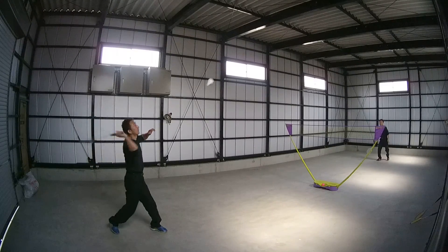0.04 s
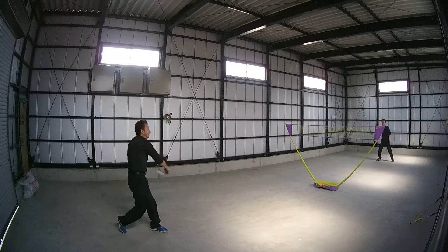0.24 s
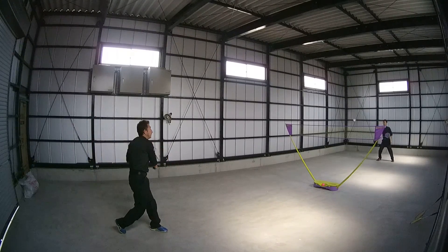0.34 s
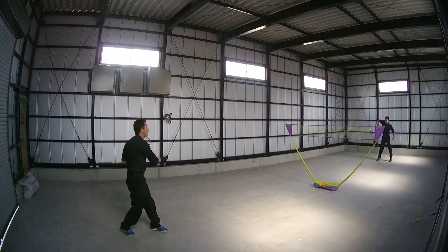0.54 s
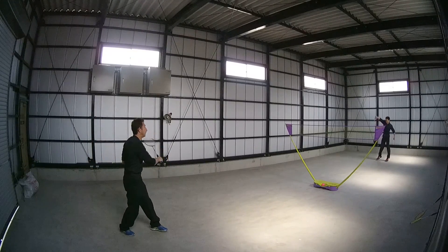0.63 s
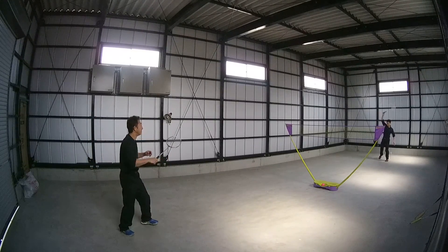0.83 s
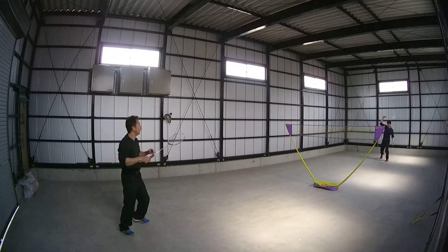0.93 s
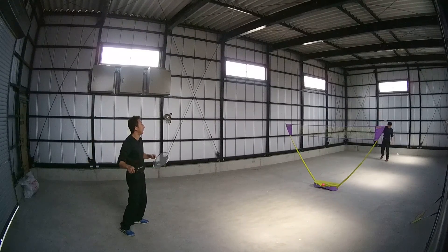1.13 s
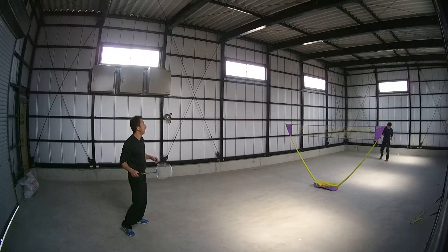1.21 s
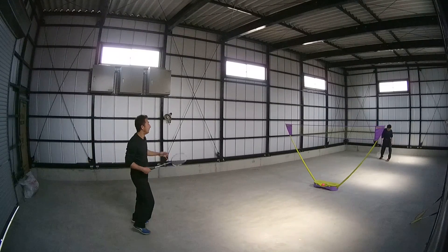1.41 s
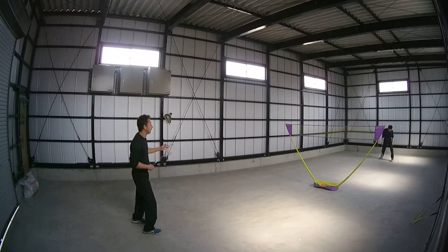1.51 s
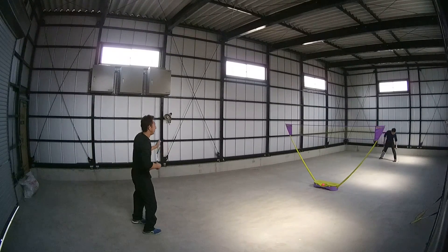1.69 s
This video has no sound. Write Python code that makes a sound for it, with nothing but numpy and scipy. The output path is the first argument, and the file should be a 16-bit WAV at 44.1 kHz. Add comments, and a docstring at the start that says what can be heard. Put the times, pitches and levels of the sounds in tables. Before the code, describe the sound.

Badminton rackets hit a shuttlecock close by, then farther off, in an echoing hall.

```python
"""Badminton rackets smack a shuttlecock in a large, empty, metal-walled warehouse: near, then far.
Each impact of the cork is a brief crack that excites the damped modes of strings and frame.
The swings whistle as air flows past the racket; shoes scuff and tap on the concrete.
Floor, walls and roof return discrete echoes, then diffuse reverberation, over a low background rush."""
import sys
import numpy as np
from scipy import signal
from scipy.fft import rfft, irfft
from scipy.io import wavfile
from scipy.ndimage import uniform_filter1d

SR = 44100
rng = np.random.default_rng(int(sys.argv[2]) if len(sys.argv) > 2 else 0)


def generate_wav(sig):
    """Save sig (samples, or channels by samples) to the path in sys.argv[1] as 16-bit PCM at SR."""
    pcm = np.round(np.clip(np.atleast_2d(sig).T, -1, 1) * 32767).astype(np.int16)
    wavfile.write(sys.argv[1], SR, pcm)


N = 77175
NEAR_S, FAR_S = 0.2217, 0.7325  # moments of contact
IMPACT_RISE_S = 0.00069

# Spectral envelopes of the two impacts: frequency_hz, relative_db
NEAR_SPECTRUM = [(40, -44), (130, -24.5), (350, -3), (600, 3.5), (850, 7), (1080, 6.5), (1250, -5),
                 (2200, -1), (4000, -8), (6000, -2), (7300, -9), (9200, -2.5), (11500, -8), (15000, -19)]
FAR_SPECTRUM = [(50, -33), (150, -12), (500, -2.5), (900, -3.5), (1250, -0.5), (1800, 4.5), (2300, 1.5),
                (2900, 4), (3400, 0.5), (3900, -3.5), (5300, -0.5), (7200, -6.5), (9200, 2), (11500, -8.5),
                (15000, -15.5)]
# Normal modes of strings and frame: pitch_hz, relative_db, t60_s
NEAR_MODES = [(847, -20.5, 0.46), (1056, -30, 0.6), (2058, -42, 0.6), (2295, -21.5, 0.39), (3152, -27, 0.3),
              (4040, -23, 0.16), (6760, -30, 0.043), (8680, -17, 0.045), (9250, -17.5, .1)]
FAR_MODES = [(1863, -15.5, 0.096), (2890, -22, 0.022), (2950, -13, 0.078), (3350, -13.5, 0.01),
             (5370, -19, 0.016)]
# Response of the direct path, weaker in the midrange than the hall: frequency_hz, relative_db
DIRECT_SPECTRUM = [(50, -2.5), (280, 7), (900, -8.5), (2000, -5.5), (3400, 0.5), (5500, 1.5), (12000, 5)]
# Reflections from the floor and nearest walls: delay_s, relative_db, smear_s
EARLY_REFLECTIONS = [(.0082, 0, .002), (.0112, -0.5, .003), (.0145, -4, 0.0076), (.0272, -5, 0.0026)]
# Later, duller echoes from the sheet-metal walls and roof: delay_s, relative_db
WALL_ECHOES = [(.068, -13.5), (.094, -9), (.166, -14)]
# Airflow past shaft and strings: peak_s, level_db, centre_hz
SWINGS = [(0.216, -26, 864), (0.72, -35.5, 754)]
# Soles sliding on concrete: start_s, length_s, level_db
SLIDES = [(-.03, 0.13, -41.5), (0.124, 0.057, -45.5), (0.196, 0.045, -38.5), (.572, 0.07, -50),
          (.89, 0.047, -47), (1.011, 0.094, -56), (1.092, 0.06, -60), (1.236, 0.049, -65),
          (1.335, 0.1, -65.5), (1.486, 0.11, -57.5), (1.566, 0.076, -45.5)]
# Spectrum of sliding friction: frequency_hz, relative_db
FRICTION_SPECTRUM = [(300, -15), (1300, -10), (2100, -3), (3600, -2), (4700, -5.5), (6200, -0.5),
                     (7300, -10.5), (9300, 2), (12000, -9), (15000, -21.5)]
# Footfalls and creaks of soles: start_s, level_db, centre_hz, width_hz, decay_s
FOOTFALLS = [(0, -53, 612, 556, 0.051), (.005, -51, 1830, 600, .03), (1.047, -41, 690, 500, 0.029),
             (1.068, -45, 1900, 700, 0.022), (1.441, -47.5, 545, 490, 0.012),
             (1.54, -54.5, 1910, 796, 0.014), (1.552, -41, 1900, 1030, 0.0017),
             (1.564, -52, 2310, 1013, 0.054), (1.715, -40.5, 1760, 680, 0.0022)]
# Reverberation time of the hall: frequency_hz, t60_s
HALL_T60 = [(100, 1.6), (350, 1.75), (800, 2.055), (1500, 1.72), (2700, 1.22), (4200, 0.63), (6300, 0.68),
            (9500, .5), (15000, 0.26)]
# Spectrum of the background rush: frequency_hz, relative_db
RUSH_SPECTRUM = [(25, -63), (60, -28.5), (100, -20.5), (200, -4.5), (320, -5.5), (600, -1.5), (850, -5),
                 (1250, -17.5), (2000, -21.5), (4000, -32.5), (9000, -33.5), (15000, -39.5)]


def smack(start_s, spectrum, modes, level_db, direct_db, early_db):
    """Impact excitation: cork strikes the string bed, and each normal mode decays exponentially."""
    t, out = np.arange(N) / SR, np.zeros(N)
    racket = np.zeros(N)
    for hz, mode_db, t60_s in modes:
        ring = np.sin(2 * np.pi * hz * t) * amp(-60 * t / t60_s)
        racket += amp(mode_db) * unit_energy(ring)
    add(racket, 0, click(spectrum))
    add(out, start_s, convolve(racket, impact_paths(direct_db, early_db)))
    return amp(level_db) * out


def impact_paths(direct_db, early_db):
    """Multipath propagation: the direct crack, delayed reflections and the diffuse tail add."""
    crack = burst(rng.choice([-1., 1.], N), IMPACT_RISE_S, decay_s=0.0016)
    paths = amp(direct_db) * convolve(crack, click(DIRECT_SPECTRUM)) + hall()
    for delay_s, db, smear_s in EARLY_REFLECTIONS:
        reflection = burst(rng.standard_normal(N), IMPACT_RISE_S, smear_s)
        add(paths, delay_s, amp(db + early_db) * reflection)
    for delay_s, db in WALL_ECHOES:
        echo = burst(noise_band(centre_hz=670, width_hz=750), rise_s=0.0054, decay_s=0.0054)
        add(paths, delay_s, amp(db + early_db) * echo)
    return paths


def air_push(start_s, gain_db=-23.5, time_constant_s=0.0005):
    """Air displacement: the racket radiates one soft low pulse, compression then rarefaction."""
    u, out = np.arange(N) / SR / time_constant_s, np.zeros(N)
    add(out, start_s, amp(gain_db) * u * (2 - u) * np.exp(-u))
    return out


def swish(peak_s, level_db, centre_hz, rise_s=0.0097, fall_s=0.023):
    """Aerodynamic noise: it swells as the racket speeds up and fades in the follow-through."""
    t = np.arange(N) / SR - peak_s
    speed = np.exp(-(t / np.where(t < 0, rise_s, fall_s)) ** 2)
    flow = unit_energy(speed * noise_band(centre_hz, width_hz=620))
    air = amp(level_db) * np.linalg.norm(speed) * flow
    return reverberate(air, wet_db=-7.5)


def scuffs(rise_s=0.0067, fall_s=0.044, grain_db=1):
    """Sliding friction: soles on concrete make a hiss whose level flickers with the grit."""
    t, pressure = np.arange(N) / SR, np.zeros(N)
    for start_s, length_s, db in SLIDES:
        ramps = np.minimum((t - start_s) / rise_s, (start_s + length_s - t) / fall_s)
        pressure += amp(db) * np.clip(ramps, 0, 1)
    roughness = unit_rms(uniform_filter1d(rng.standard_normal(N), size=40))
    grit = unit_rms(amp(grain_db * roughness))
    return reverberate(pressure * grit * shaped_noise(FRICTION_SPECTRUM), wet_db=-4.5)


def steps():
    """Damped resonance: each knock or creak of a shoe is a band of noise that dies quickly."""
    out = np.zeros(N)
    for start_s, db, centre_hz, width_hz, decay_s in FOOTFALLS:
        knock = burst(noise_band(centre_hz, width_hz), IMPACT_RISE_S, decay_s)
        add(out, start_s, amp(db) * np.sqrt(decay_s * SR) * knock)
    return reverberate(out, wet_db=-6.5)


def reverberate(sound, wet_db):
    """Linear room response: a sound is heard together with its convolution with the hall."""
    return sound + amp(wet_db) * convolve(sound, hall())


def hall(gain_db=-26, treble_build_s=0.0055, bass_lag_s=0.023):
    """Diffuse field: the treble builds and dies first; lower frequencies build slowly and linger."""
    hz, t, field = signal.stft(rng.standard_normal(N), SR, nperseg=256)
    build_s = treble_build_s + bass_lag_s / (1 + (hz[:, None] / 1200) ** 2)
    growth = 1 - np.exp(-t / build_s)
    decay = amp(-60 * t / curve_at(HALL_T60, hz)[:, None])
    return amp(gain_db) * signal.istft(field * decay * growth, SR, nperseg=256)[1][:N]


def background_rush(level_db=-45.5):
    """Stationary noise: a steady rush with most of its power below 1 kHz."""
    return amp(level_db) * shaped_noise(RUSH_SPECTRUM)


def shaped_noise(spectrum):
    """Spectral shaping: white noise takes on the given envelope, at rms 1."""
    gain = amp(curve_at(spectrum, np.fft.rfftfreq(N, 1 / SR)))
    return unit_rms(irfft(rfft(rng.standard_normal(N)) * gain, N))


def noise_band(centre_hz, width_hz):
    """Band-pass filtering: steady noise in one broad resonance, at rms 1."""
    detuning = (np.fft.rfftfreq(N, 1 / SR) - centre_hz) / (width_hz / 2)
    return unit_rms(irfft(rfft(rng.standard_normal(N)) / (1 + detuning ** 4) ** 2, N))


def click(spectrum, size=4096):
    """Minimum phase: the shortest causal pulse with the given spectrum."""
    log_gain = np.log(amp(curve_at(spectrum, abs(np.fft.fftfreq(size, 1 / SR)))))
    response = np.exp(np.conj(signal.hilbert(log_gain)))
    return unit_energy(np.fft.ifft(response).real[:size // 2])


def burst(carrier, rise_s, decay_s):
    """Exponential rise and decay: a transient of energy 1."""
    t = np.arange(N) / SR
    return unit_energy(carrier * (1 - np.exp(-t / rise_s)) * np.exp(-t / decay_s))


def convolve(x, response):
    """Convolution, cut to the length of the scene."""
    return signal.fftconvolve(x, response)[:N]


def add(mix, start_s, sound):
    """Superposition of a sound delayed by start_s."""
    part = mix[round(start_s * SR):][:len(sound)]
    part += sound[:len(part)]


def curve_at(points, hz):
    """Interpolation on a log-frequency axis."""
    frequencies, values = np.transpose(points)
    return np.interp(np.log(hz + 1), np.log(frequencies + 1), values)


def amp(db):
    """Decibels to amplitude ratio."""
    return 10 ** (np.asarray(db) / 20)


def unit_rms(x):
    """Normalisation to rms 1."""
    return x / np.sqrt(np.mean(x ** 2) + 1e-20)


def unit_energy(x):
    """Normalisation to energy 1."""
    return x / np.sqrt(np.sum(x ** 2) + 1e-20)


def scene():
    """Superposition: two strokes, footwork and the background add in one channel."""
    swings = sum(swish(*swing) for swing in SWINGS)
    near = smack(NEAR_S, NEAR_SPECTRUM, NEAR_MODES, level_db=12.5, direct_db=2, early_db=-3)
    far = smack(FAR_S, FAR_SPECTRUM, FAR_MODES, level_db=-3.5, direct_db=-2.5, early_db=-8)
    return (near + far + air_push(NEAR_S) + swings + scuffs() + steps() + background_rush())[None]


def record(dry):
    """Linear-phase filtering: a narrow notch in the treble and a steep upper band limit."""
    notch_hz, width_hz, limit_hz = 7880, 380, 15250
    edges_hz = [notch_hz - width_hz / 2, notch_hz + width_hz / 2, limit_hz]
    taps = signal.firwin(801, edges_hz, window=("kaiser", 7), fs=SR)
    return signal.oaconvolve(dry, taps[None], "same")


dry = scene()
out = record(dry)
generate_wav(out)
```